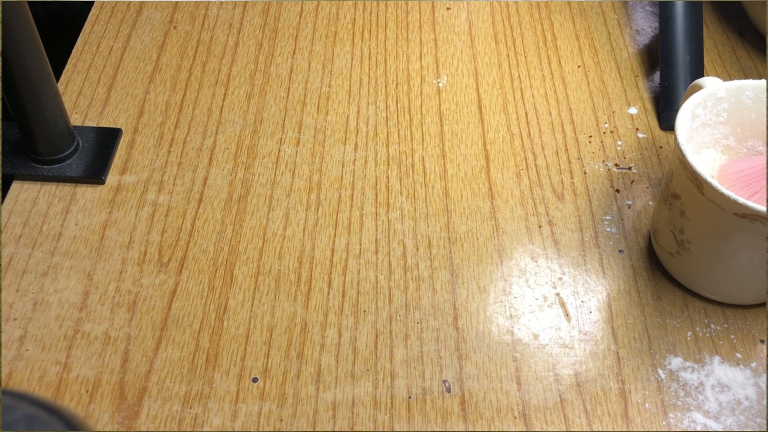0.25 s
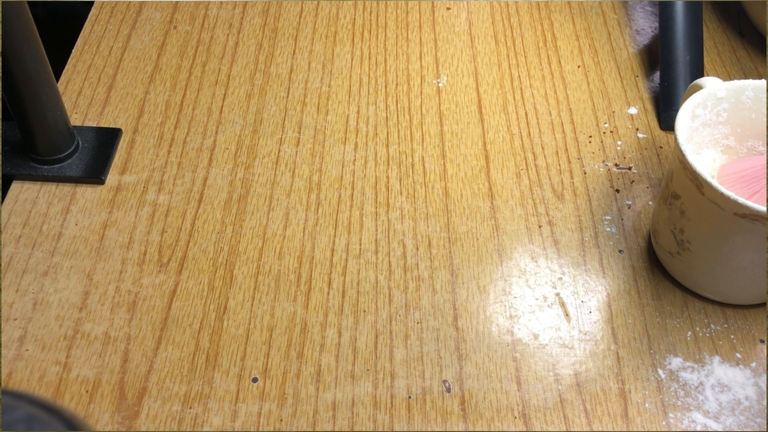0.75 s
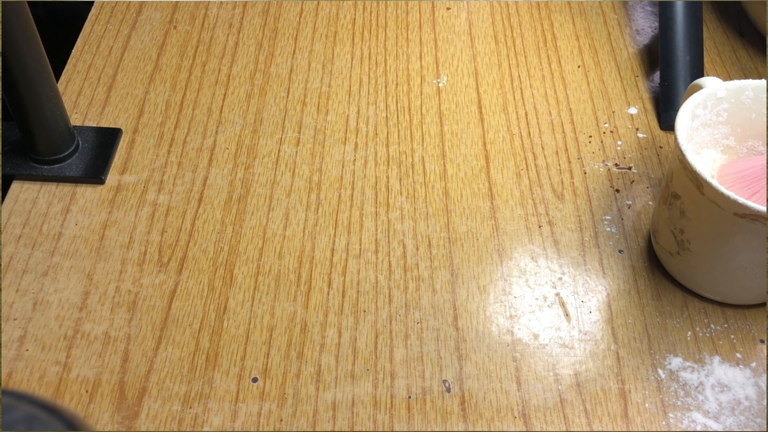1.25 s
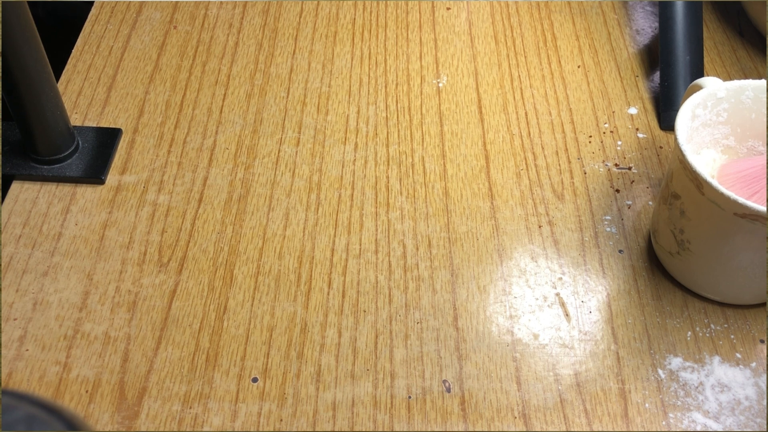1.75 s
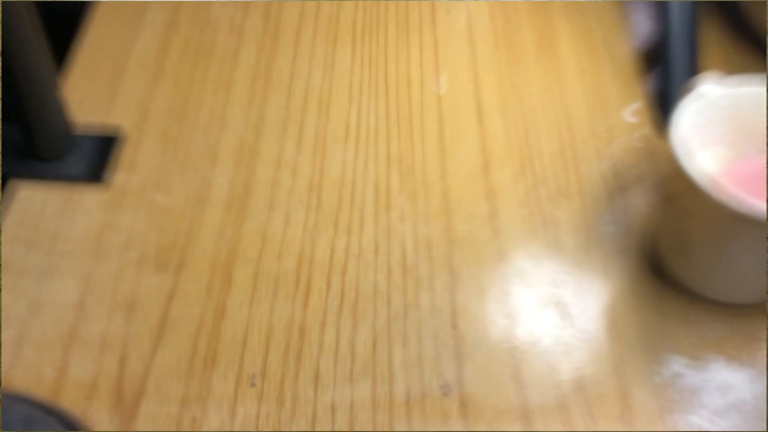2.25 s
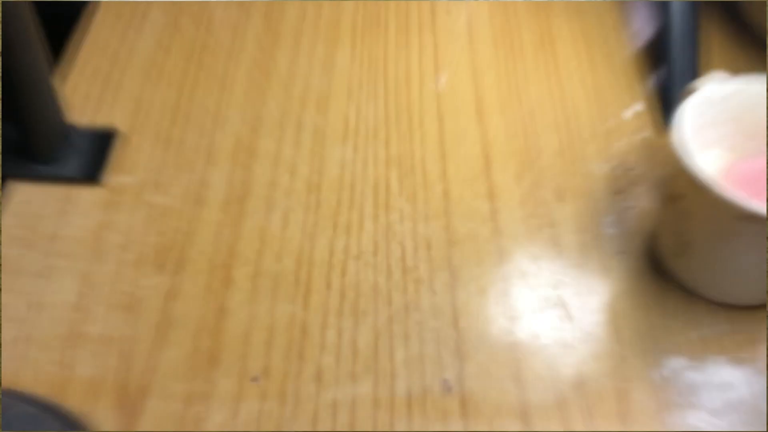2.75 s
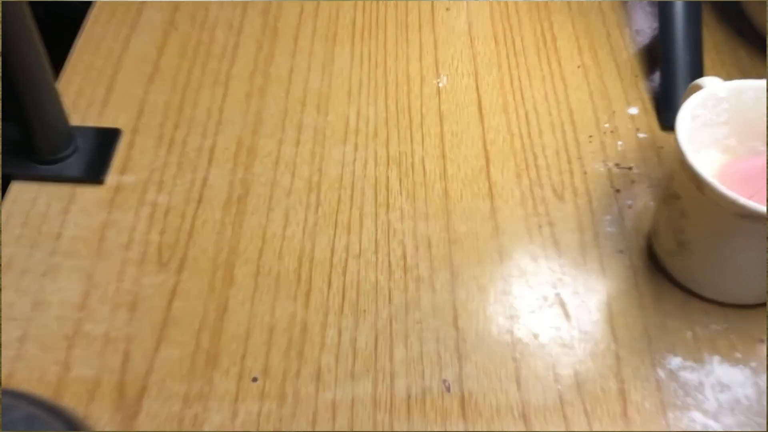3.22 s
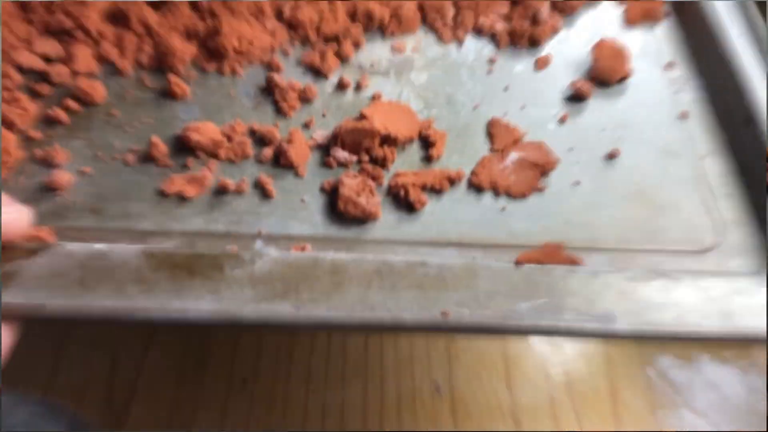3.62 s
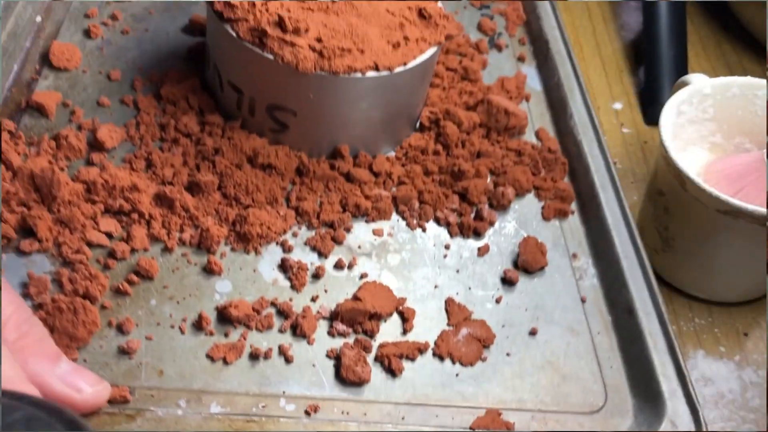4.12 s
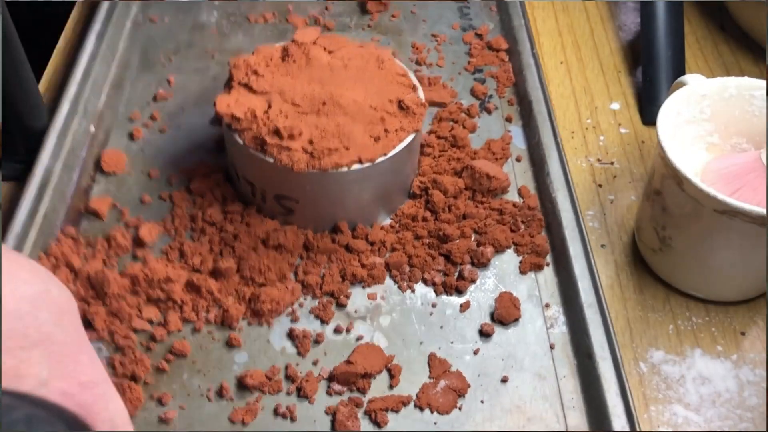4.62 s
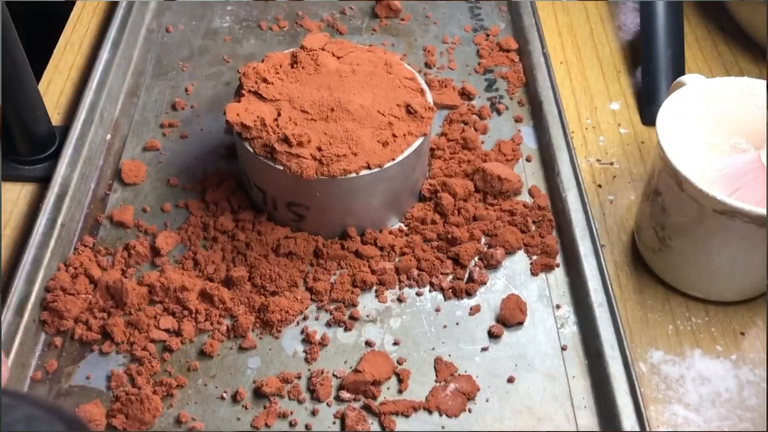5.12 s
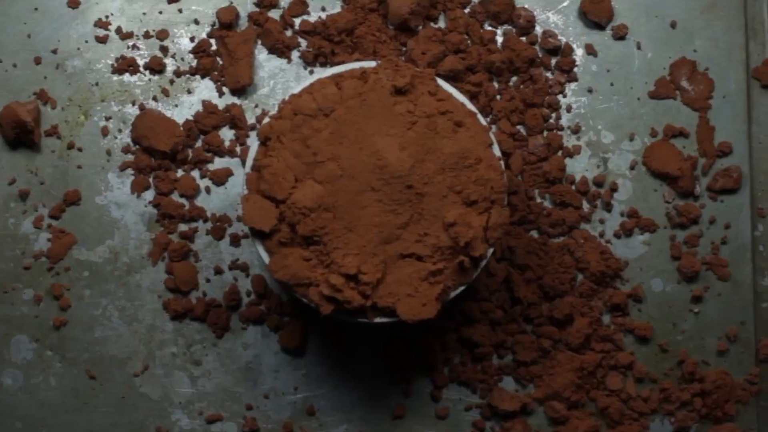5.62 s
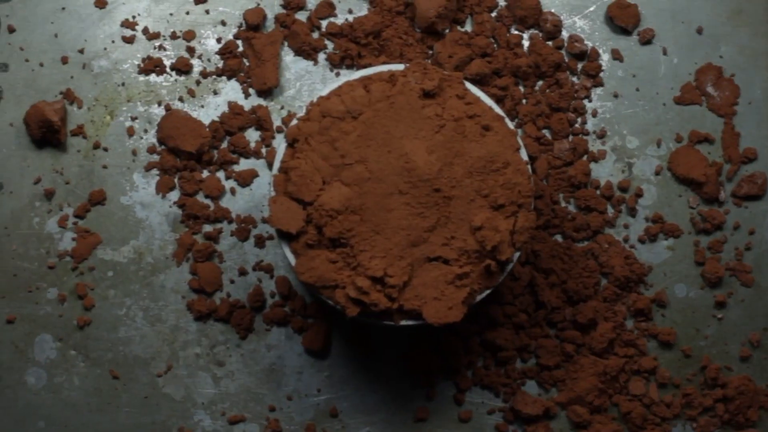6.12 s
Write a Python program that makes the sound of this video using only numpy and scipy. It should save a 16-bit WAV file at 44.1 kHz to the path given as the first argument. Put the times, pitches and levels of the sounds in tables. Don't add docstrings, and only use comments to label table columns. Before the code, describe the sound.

Small handling ticks and cloth rustle, three heavy overloaded bench blows, then a steel tray scrapes, bangs down and gritty sand crunches.

```python
import sys
import numpy as np
from scipy import signal
from scipy.fft import rfft, irfft, next_fast_len
from scipy.io import wavfile
from scipy.ndimage import uniform_filter1d, map_coordinates

SR = 44100
rng = np.random.default_rng(int(sys.argv[2]) if len(sys.argv) > 2 else 0)


def file_out(sig):
    cols = np.atleast_2d(sig).T
    lim = np.clip(cols, -1, 1)
    pcm = np.round(lim * 32767).astype(np.int16)
    wavfile.write(sys.argv[1], SR, pcm)


def gain_from_db(level_db):
    decades = np.asarray(level_db, float) / 20
    return 10 ** decades


N = 280801
TIME = np.arange(N) / SR

# frequency in Hz, level in dB per Hz.
HUM = [(120, -39), (200, -7), (392, 1), (437, -4), (480, -2), (904, -3.5), (1140, -8), (1900, -20.5),
       (3480, -28.5), (5000, -31.5), (6500, -37), (11000, -120)]
# frequency in Hz, level in dB per Hz.
TREMOR = [(15, -30), (25, -5), (60, -5.5), (90, 0), (115, 1), (145, 0.5), (200, -6), (260, -44)]
# frequency in Hz, level in dB per Hz.
HISS = [(2000, -30.5), (3500, -6.5), (7500, -5.5), (10300, -1), (13000, -5), (15700, -8)]
# multiple of the base frequency, level in dB.
WHINE = [(9, -79), (10, -78), (11, -80), (12, -89)]
WHINE_HZ = 997.7
HUM_DB, TREMOR_DB, HISS_DB = -43, -55, -71
# peak time in seconds, peak in dB, rise and fall in s per 20 dB.
SHUDDERS = [
    (0.0, -43, .05, .55),
    (.51, -48, .15, .1),
    (1.57, -48, .07, .25),
    (2.0, -50, .12, .45),
    (3.67, -48, .25, .25),
    (4.05, -49, .05, .12),
    (4.8, -44, .15, .1),
    (6.04, -47, .07, .15),
]
# peak time in seconds, peak in dB, rise and fall in s per 20 dB.
SHOVES = [
    (0.0, -46, .05, .5),
    (.55, -44, .25, .25),
    (1.52, -46, .3, .6),
    (2.19, -41.5, .9, .05),
    (3.33, -45, .05, .9),
    (4.64, -31, .1, .17),
]
# time in seconds, depth in dB.
DUCKS = [
    (2.33, 2),
    (2.8, 7),
    (3.2, 8.5),
    (4.82, 6.5),
]
DUCK_HOLD_S, DUCK_RECOVER_S = .07, .24
AFTERSHAKE_DB, AFTERSHAKE_LAG_S, AFTERSHAKE_FALL_S = -50, .09, .6

# time in seconds, peak in dB, centre in Hz, brightness in dB.
TICKS = [(0.023, -27, 1850, -1), (0.0844, -32, 1550, -18), (0.3594, -35, 5540, -13),
         (0.4224, -25, 1970, -32), (0.5048, -25, 1860, -10), (0.5447, -26, 2130, -10),
         (0.599, -22.5, 1490, -5), (0.6809, -26, 1100, -30), (.694, -36, 3000, -2),
         (0.9524, -33, 2140, -26), (1.239, -30.5, 2200, 0), (1.3036, -32.5, 2560, -25),
         (1.6175, -28, 1520, -25), (1.7345, -17.5, 1600, -15), (2.112, -32, 2300, -25),
         (3.635, -20.5, 1630, -8), (5.052, -38, 2400, -3), (5.063, -35, 3800, -6), (5.078, -33, 2700, -14),
         (5.126, -32, 3600, -12), (5.14, -40, 2500, -14), (5.23, -35, 3100, -12), (5.31, -44, 6000, -12),
         (5.338, -43, 6400, -12), (5.368, -39, 2600, -20), (5.425, -45, 6300, -12), (5.535, -42, 6200, -15)]
# time in seconds, peak in dB, centre in Hz, brightness in dB.
LUMPS = [(2.679, -4, 2200, -40), (3.0818, -17.5, 1550, -29.5), (4.5118, -30, 1500, -22),
         (4.5472, -25, 1930, -15), (4.604, -22, 2000, -12), (4.7203, -24, 8000, 0), (4.744, -20, 1900, -12),
         (4.774, -16, 1906, 3), (5.6068, -21, 3360, -10), (5.6346, -17, 2610, -15.5),
         (5.6528, -2.5, 1830, -8.5), (5.622, -24, 2600, -18), (5.6667, -12, 3260, -20),
         (5.711, -16, 2700, -12), (5.788, -20, 2800, -14), (5.804, -22, 2500, -8), (5.693, -6, 2300, -6),
         (5.7555, -16, 2540, -8), (5.7632, -10, 2700, -12), (5.9859, -32, 2500, -25),
         (5.9999, -29, 2700, -6), (6.0183, -23, 2180, -20), (6.0325, -15, 1950, -6),
         (6.051, -15, 1700, -14), (6.0714, -13, 1580, -12), (6.083, -15, 8500, -2),
         (6.0894, -13, 1590, -18), (6.111, -18, 1300, -20), (6.13, -11, 3170, -6)]
TICK_T60_S, TICK_T60_PER_DB = .08, .0015
LUMP_T60_S = .075
LUMP_SNAP, SNAP_T60_S = 2.5, .014

# peak time in seconds, peak in dB, rise and fall in s per 20 dB.
RUSTLE = [(.032, -41, .04, .09), (.186, -51, .08, .19), (.36, -49, .08, .11), (.424, -43.5, .03, .4),
          (.602, -34.5, .015, .06), (.69, -50, .06, .03), (1.31, -52, .22, .09), (1.556, -47.5, .45, .25),
          (1.77, -47, .03, .04), (1.86, -45, .12, .3), (1.99, -42.5, .25, .3), (2.13, -44, .2, .12),
          (3.292, -53, .005, .15), (4.1, -53, .02, .05), (4.228, -55, .09, .08), (4.37, -55, .08, .02),
          (4.966, -54, .2, .2), (5.058, -53, .015, .14), ]
# frequency in Hz, level in dB per Hz.
CLOTH = [(530, -22), (900, -22.5), (1240, -1.5), (1400, -9.5), (1510, -4), (4630, -15.5), (10700, -24),
         (14400, -22), (15700, -40)]
SHEEN_DB, SHEEN_GROWS, SHEEN_S = -35.5, .45, .25

# time in seconds, boom, upper boom and boards in dB, damping factor.
THUDS = [
    (.055, -29.5, -52, -39.5, 1.2),
    (0.577, -46, -31, -31.5, 1.1),
    (.588, -28, -54, -47, 0.45),
    (4.386, -34, -33, -50, 1.5),
    (4.656, -25, -26, -50, 1.5),
]
THUD_RATTLE_DB = -60
# time in seconds, strength in dB, boards in relative dB,
# delay of the rebound in seconds, upper boom of the rebound in relative dB.
BLOWS = [
    (2.2504, 6.5, -19, .0136, -1.5),
    (2.6802, 8.6, -5, .0168, -13.5),
    (3.083, 5.7, -4, .015, -5.5),
]
# frequency in Hz, level in dB, t60 in seconds.
BOOM = [(41.8, -12, .12), (90.5, 4.5, 0.12), (95.2, -42.5, 1.23)]
# frequency in Hz, level in dB, t60 in seconds.
UPPER = [(144.9, 0.5, 0.12), (205.2, -7.5, 0.13), (140, -47, 0.9), (262, -38, .5), (345, -43, .6)]
# frequency in Hz, level in dB, t60 in seconds.
BOARDS = [(226, -4, .14), (262, 1, 0.17), (326, -4.5, .13), (348, -3, .11), (402, 4, 0.11),
          (445.4, -6.5, 0.16), (484, -8, 0.094), (532, -6, 0.1), (608, -8, 0.15), (664, -11.5, 0.11),
          (785, -7.5, 0.093), (996, -16, .09), (1177, -15, .09), (1387, -10.5, 0.11)]
# frequency in Hz, level in dB per Hz.
RATTLE = [(290, -29), (500, -3.5), (957, -6), (1780, -13), (3880, -22.5), (4480, -27), (5170, -31),
          (11800, -50), (15700, -70)]
UPPER_DB, UPPER_GROWS, RATTLE_DB, RATTLE_GROWS, DAMPING = 0.2, -.01, -13.5, .36, 1.11
REBOUND_BOOM_DB, REBOUND_BOARD_DB, REBOUND_RATTLE_DB = -31, 2, -16.5
REBOUND_DAMPING, REBOUND_GROWS = 1.32, .25

# time in seconds, frequency in Hz, level in dB, t60 in seconds.
TUBES = [(.17, 3200, -50, .3), (.1, 5642, -66, .9), (2.3, 3531, -58, 3.7), (2.3, 1717, -61, 2.5),
         (2.74, 2842, -54.5, 4), (2.78, 3531, -60, 3.3), (2.78, 4603, -71, 2.5), (3.17, 2870, -59, 2.3),
         (3.19, 3560, -60, 0.89), (3.29, 2800, -52, .25), (3.899, 2366, -50, 1.6), (3.905, 6750, -42, 0.18),
         (3.92, 6370, -48, 0.33), (4.08, 2379, -57, 1.6), (4.1, 5620, -66, 2.8), (.98, 5642, -66, 1.2),
         (5.1, 5642, -70, 1.2)]

# peak time in seconds, peak in dB, rise and fall in s per 20 dB.
DRAWS = [
    (1.975, -50, .04, .2),
    (2.04, -47, .12, .15),
    (2.11, -50, .05, .06),
    (2.14, -48, .04, .1),
    (2.19, -52, .06, .06),
]
# frequency in Hz, width in Hz, level in dB.
BLADE = [(1250, 90, -3), (1520, 60, 0), (1660, 50, -3), (1800, 70, -2), (2140, 70, -5), (2430, 70, -8),
         (2900, 200, -12)]

# time in seconds, level in dB, share riding on its rim from 0 to 1.
DRAG = [
    [(3.38, -80, 0.9), (3.386, -33.5, 0.14), (3.486, -35.5, 0.47), (3.51, -40.5, 0.45), (3.59, -34, 0.55),
     (3.76, -41.5, .98), (3.93, -36, 0.78), (3.95, -50, 0.65), (3.98, -56, 0.65)],
    [(4.03, -60, 0.65), (4.036, -33.5, 0.5), (4.08, -34, 0.6), (4.12, -60, 0.4)],
]
# time in seconds, strength in dB over the slide, fall in s per 20 dB.
CATCHES = [(3.455, 4, .05), (3.5584, 5, .04), (3.5998, 6, .06), (3.6343, 3, .03), (3.7216, 4, .04),
           (3.744, 5, .05), (3.8019, 3, .02), (3.8114, 4, .04), (3.8308, 3, .04), (3.8612, 4, .06),
           (3.885, 2, .04), (3.9101, 3.5, .05), (4.0473, 3, .04)]
# frequency in Hz, width in Hz, level in dB.
SHEET = [(640, 120, 0.5), (1034, 40, 4.5), (1470, 78, 2.5), (2430, 61, -9), (1740, 90, -9),
         (3160, 70, -4.5), (3540, 60, -10), (4750, 130, -17), (7290, 40, -20), (5860, 180, -27),
         (6630, 70, -17), (7970, 90, -24), (12500, 50, -24)]
# frequency in Hz, width in Hz, level in dB.
RIM = [(623, 79, -8), (800, 150, -6.5), (1420, 55, 7), (1910, 88, -13.5), (2494, 60, -7), (2810, 110, -9),
       (3040, 50, -9), (3570, 82, -18), (5600, 170, -22), (7320, 40, -23), (4120, 140, -21),
       (6580, 70, -19), (12300, 70, -25)]
# frequency in Hz, level in dB per Hz.
SCUFF = [(300, -12), (800, 1), (3000, -9), (8000, -18.5), (15700, -30)]

# time in seconds, strength
# in dB, low modes in relative dB (how flat it strikes), # grit in relative dB.
DROPS = [(3.386, -36, 11, -8), (3.557, -31, -3, -16), (4.035, -24.5, -13, -22.5), (4.386, -5, -1.5, -10),
         (4.391, -11, -6, -14), (4.399, -12.5, -6, -20), (4.4162, -14.5, -2, -12), (4.426, -13, -3, -36),
         (4.62, -20, -5, -4), (4.656, 6, -17.5, -6.5), (4.72, -17, -24, -19.5), (4.732, -17.5, -22, -17.5)]
# frequency in Hz, level in dB, t60 in seconds.
TRAY_BELLY = [(310.6, 5, 0.071), (342, -2.5, 0.11)]
# frequency in Hz, level in dB, t60 in seconds.
TRAY_LOW = [(442, 14.5, 0.024), (494, -4.5, 0.09), (626, 1.5, 0.088), (661, 1.5, 0.067), (802, 11, 0.023),
            (1031, 7, .05)]
# frequency in Hz, level in dB, t60 in seconds.
TRAY_HIGH = [(1186, -6, 0.07), (1267, -3, 0.055), (1590, -3, 0.054), (1850, -4.5, 0.075),
             (1900, -0.5, 0.028), (2295, -9.5, 0.091), (2390, -12, .04), (2750, -7, 0.02)]
# frequency in Hz, level in dB per Hz.
CRACK = [(880, -25), (1500, 0), (3780, -12), (4920, -18), (8210, -27), (10500, -25), (15700, -41)]

# peak time in seconds, peak in dB, rise and fall in s per 20 dB.
BITES = [
    (4.44, -38, .02, .09),
    (4.61, -31, .12, .04),
    (4.652, -30, .04, .03),
    (4.69, -33, .05, .04),
    (4.735, -29.5, .03, .085),
    (5.658, -26, .045, .07),
    (5.696, -22.5, .005, .05),
    (5.78, -31, .075, .05),
    (6.064, -24, .068, .09),
    (6.134, -27, .015, .04),
]
# peak time in seconds, peak in dB, rise and fall in s per 20 dB.
LOADS = [
    (4.45, -34, .02, .11),
    (4.635, -26, .02, .08),
    (4.72, -29, .09, .12),
    (5.685, -24, .055, .13),
    (5.78, -32, .08, .06),
    (6.075, -22, .06, .1),
]
# frequency in Hz, level in dB per Hz.
SAND = [(410, -27), (700, -4), (862, 0.5), (1190, -6), (1860, -2.5), (3290, -5.5), (6070, -20.5),
        (6740, -18), (11000, -18), (13600, -27), (15700, -39.5)]
# frequency in Hz, width in Hz, level in dB.
LOADED_BELLY = [(187.6, 16, -6), (312, 24, 2), (466, 69, -4.5), (681, 20, -8)]
STROKE_CURVE = 1.4
FINES_DB, FINES_GROW, FINES_HZ = 1.2, 1.12, 5200

# frequency in Hz, t60 in seconds.
SHOP = [(150, 0.23), (1000, 0.15), (8000, 0.062)]
# time in seconds, half width in seconds, depth in dB.
CHANGE = (3.2865, .004, -16)
BENCH_AGAIN_S = 4
CLIP_TOP, CLIP_HARD = .93, 7
EMPHASIS_HZ = 6500


def unit(x):
    return x / np.sqrt(np.mean(x ** 2) + 1e-20)


def along(points, hz):
    f, v = np.transpose(points)
    return np.interp(np.log(hz + 1), np.log(f + 1), v)


def filtered(x, response):
    n = x.shape[-1]
    m = next_fast_len(n + SR // 8)
    return irfft(rfft(x, m) * response(np.fft.rfftfreq(m, 1 / SR)), m)[..., :n]


def coloured(x, spectrum):
    return unit(filtered(x, lambda hz: gain_from_db(along(spectrum, hz))))


def resonances(modes):
    def response(f):
        return sum((-1) ** k * gain_from_db(db) * 1j * f * width / (hz * hz - f * f + 1j * f * width)
                   for k, (hz, width, db) in enumerate(modes))
    return response


def wobble(rate, size=N):
    knots = rng.standard_normal(int(size * rate / SR) + 4)
    return map_coordinates(knots, [TIME[:size] * rate], order=2)


def white():
    return rng.standard_normal(N)


def grit(clump_db, clump_rate, spike_db, size=N):
    grains = rng.standard_normal(size)
    return grains * gain_from_db(clump_db * wobble(clump_rate, size=size) + spike_db * wobble(1500, size=size))


def ring(modes, t, damping, attack, scatter_db, rough=0):
    luck = rng.standard_normal((len(modes), 2))
    steps = rng.standard_normal((len(modes), len(t) if rough else 1))
    stray = rough * np.cumsum(steps, axis=1) / np.sqrt(SR)
    tone = 0
    for (hz, db, t60), (a, b), drift in zip(modes, luck, stray):
        decay = gain_from_db(db + scatter_db * a - 60 * t * damping / t60)
        tone = tone + decay * np.sin(2 * np.pi * hz * t + 0.41 * scatter_db * b + drift)
    return tone * (1 - np.exp(-t / attack))


def add(track, s, x):
    part = track[round(s * SR):][:len(x)]
    part += x[:len(part)]


def swells(rows, curve=1):
    t = TIME[::16]
    power = 0
    for s, db, rise, fall in rows:
        distance = np.where(t < s, (s - t) / rise, (t - s) / fall)
        power = power + gain_from_db(db - 20 * distance ** curve) ** 2
    return np.interp(TIME, t, np.sqrt(power))


def ducking():
    shape_s = [-.05, 0, DUCK_HOLD_S, DUCK_HOLD_S + DUCK_RECOVER_S]
    depth_db = 0
    for s, db in DUCKS:
        same_scene = (TIME < CHANGE[0]) == (s < CHANGE[0])
        depth_db = depth_db + db * np.interp(TIME - s, shape_s, [0, 1, 1, 0]) * same_scene
    return gain_from_db(-depth_db)


def air():
    after = [(s + AFTERSHAKE_LAG_S, db + AFTERSHAKE_DB, .05, AFTERSHAKE_FALL_S) for s, db, *_ in BLOWS]
    duck = ducking()
    hum = np.hypot(gain_from_db(HUM_DB) * duck, swells(SHOVES)) * coloured(white(), HUM)
    shaking = swells(SHUDDERS) + swells(after) * (TIME < CHANGE[0])
    tremor = np.hypot(gain_from_db(TREMOR_DB), shaking) * coloured(white(), TREMOR)
    hiss = gain_from_db(HISS_DB) * coloured(white(), HISS)
    whine = sum(np.sqrt(2) * gain_from_db(db + 1.2 * wobble(9)) * np.sin(2 * np.pi * k * WHINE_HZ * TIME)
                for k, db in WHINE)
    return hum + tremor + duck * (hiss + whine)


def ticks():
    out, t = np.zeros(N), np.arange(SR // 8) / SR
    events = [(*row, TICK_T60_S + TICK_T60_PER_DB * (row[1] + 30), .61) for row in TICKS]
    events += [(*row, LUMP_T60_S, LUMP_SNAP) for row in LUMPS]
    for s, db, hz, bright_db, t60, snap in events:
        front = 1 + snap * gain_from_db(-60 * t / SNAP_T60_S)
        burst = gain_from_db(-60 * t / max(t60, .03)) * front * rng.standard_normal(len(t))
        burst = filtered(burst, resonances([(hz, 0.15 * hz, 0), (7500, 6000, bright_db - 7)]))
        add(out, s, gain_from_db(db - 7.0) * burst / np.max(np.abs(burst)))
    return out


def rustle():
    moving = swells(RUSTLE)
    slow = np.abs(uniform_filter1d(moving, round(SHEEN_S * SR)))
    sheen = gain_from_db(SHEEN_DB) * slow ** SHEEN_GROWS
    grains = moving * gain_from_db(1.0) * coloured(grit(1.6, 40, 1.5), CLOTH)
    return grains + ducking() * sheen * coloured(white(), HISS)


def contacts():
    rows = [(s, boom_db, upper_db, board_db, THUD_RATTLE_DB, damping)
            for s, boom_db, upper_db, board_db, damping in THUDS]
    for s, db, board_db, lag, upper_db in BLOWS:
        rows.append((s, db, db + UPPER_DB + UPPER_GROWS * board_db, db + board_db,
                     db + RATTLE_DB + RATTLE_GROWS * board_db, DAMPING))
        rows.append((s + lag, db + REBOUND_BOOM_DB, db + upper_db,
                     db + REBOUND_BOARD_DB + REBOUND_GROWS * board_db,
                     db + REBOUND_RATTLE_DB, REBOUND_DAMPING))
    return rows


def blows():
    out, shake, t = np.zeros(N), np.zeros(N), np.arange(SR // 2) / SR
    for s, boom_db, upper_db, board_db, rattle_db, damping in contacts():
        boom = gain_from_db(boom_db) * ring(BOOM, t, damping, 0.0067, 0.46)
        upper = gain_from_db(upper_db) * ring(UPPER, t, damping, 0.0021, 0.8)
        boards = ring(BOARDS, t[:SR // 3], damping, .001, scatter_db=1.5, rough=12)
        add(out, s, boom + upper)
        add(out, s, gain_from_db(board_db - 5) * boards)
        jump = gain_from_db(rattle_db - 60 * t * damping / 0.12)
        settle = gain_from_db(rattle_db - 19 - 60 * t / 0.27)
        add(shake, s, (jump + settle) * (1 - np.exp(-t / 0.0045)))
    return out + shake * coloured(grit(1.2, 150, 1.5), RATTLE)


def tubes():
    out, t = np.zeros(N), np.arange(SR // 2) / SR
    stilled = np.cos(np.pi * t) ** .2
    for s, hz, db, t60 in TUBES:
        add(out, s, ring([(hz, db, t60)], t, damping=1, attack=.01, scatter_db=0, rough=4) * stilled)
    return out * gain_from_db(1.1 * wobble(15))


def blade():
    return swells(DRAWS) * unit(filtered(grit(2.5, 60, 2.5), resonances(BLADE)))


def shaken(modes, slips):
    total = 0
    for mode in modes:
        tone = filtered(slips * grit(3, 45, 5, size=SR), resonances([mode]))
        flexed = np.cumsum(1 + .007 * wobble(16, size=SR))
        total = total + map_coordinates(tone, [flexed])
    return unit(total)


def drag():
    rows, out = np.vstack(DRAG), np.zeros(N)
    t = rows[0, 0] + TIME[:SR]
    caught = sum((gain_from_db(db) - 1) * gain_from_db(-20 * np.abs(t - s) / fall) * (t > s) for s, db, fall in CATCHES)
    slips = (1 + caught) * gain_from_db(1.2 * wobble(90, size=SR))
    rim = np.clip(np.interp(t, rows[:, 0], rows[:, 2]), 0, 1)
    steel = rim * shaken(RIM, slips) + (1 - rim) * shaken(SHEET, slips)
    scuff = coloured(grit(1.9, 68.4, 2.2, size=SR), SCUFF)
    add(out, t[0], gain_from_db(3.5) * steel + gain_from_db(-11) * scuff)
    level = sum(gain_from_db(np.interp(TIME, r[:, 0], r[:, 1], -150, -150)) for r in map(np.array, DRAG))
    return level * out


def drops():
    out, crack, t = np.zeros(N), np.zeros(N), np.arange(SR // 4) / SR
    for s, db, flat_db, crack_db in DROPS:
        belly = gain_from_db(flat_db + 1.2 + .2 * db) * ring(TRAY_BELLY, t, 1, .0015, scatter_db=1, rough=9)
        low = gain_from_db(flat_db - 5.0) * ring(TRAY_LOW, t, 1, .0008, scatter_db=2, rough=12)
        high = gain_from_db(-8.5) * ring(TRAY_HIGH, t, 1, .0003, scatter_db=1.5, rough=18)
        add(out, s, gain_from_db(db) * (belly + low + high))
        add(crack, s, gain_from_db(db + crack_db + 4.5) * (gain_from_db(-60 * t / 0.029) + gain_from_db(-17 - 60 * t / 0.15)))
    out = filtered(out, lambda hz: (1j * hz / (150 + 1j * hz)) ** 2)
    return out + crack * coloured(grit(1.5, 200, 0.77), CRACK)


def strokes():
    crunch = coloured(grit(.8, 110, 2.5), SAND)
    fines = filtered(crunch, lambda hz: 1 / (1 + (FINES_HZ / (hz + 1)) ** 6))
    bite = swells(BITES, STROKE_CURVE)
    fines_gain = gain_from_db(FINES_DB) * bite * (bite / bite.max()) ** (FINES_GROW - 1)
    sand = bite * (crunch - fines) + fines_gain * fines
    belly = unit(filtered(grit(2.1, 50, 0.5), resonances(LOADED_BELLY)))
    return gain_from_db(-1.5) * sand + gain_from_db(-2.0) * swells(LOADS, STROKE_CURVE) * belly


def shop(x):
    hz, t, z = signal.stft(rng.standard_normal(SR // 2), SR, nperseg=256)
    decay = gain_from_db(-60 * t / along(SHOP, hz)[:, None])
    tail = signal.istft(z * decay, SR, nperseg=256)[1]
    return signal.fftconvolve(np.pad(x, (300, 0)), tail / np.linalg.norm(tail))[:N]


def scene():
    bench_heard = (TIME < CHANGE[0]) | (TIME > BENCH_AGAIN_S)
    hits = blows() * bench_heard + drops() + ticks()
    mix = hits + gain_from_db(-22) * shop(hits)
    mix = mix + tubes() + drag() + strokes() + blade() + rustle() + air()
    return mix[None]


def band_limit(x):
    return signal.sosfilt(signal.butter(12, 15850, fs=SR, output="sos"), x)


def record(dry):
    def lift(hz):
        return 1 + 1j * hz / EMPHASIS_HZ

    def capsule(hz):
        return 1j * hz / (5 + 1j * hz) / (1 + (hz / 15500) ** 16) / lift(hz)

    x = filtered(dry[0], lift)
    x = x / (1 + np.abs(x / CLIP_TOP) ** CLIP_HARD) ** (1 / CLIP_HARD)
    x = filtered(x, capsule)
    s, width, db = CHANGE
    x = x * gain_from_db(db * np.exp(-((TIME - s) / width) ** 2))
    return band_limit(x[None])


dry = scene()
out = record(dry)
file_out(out)
```